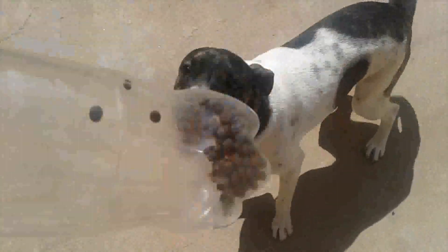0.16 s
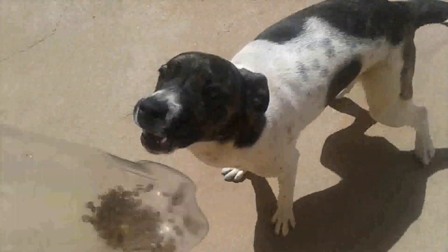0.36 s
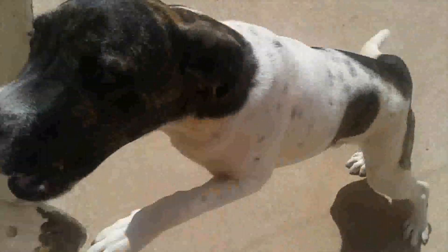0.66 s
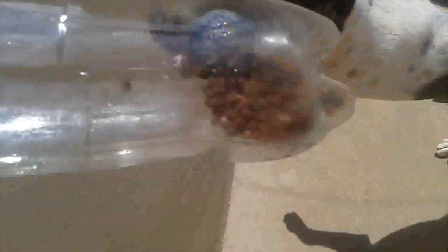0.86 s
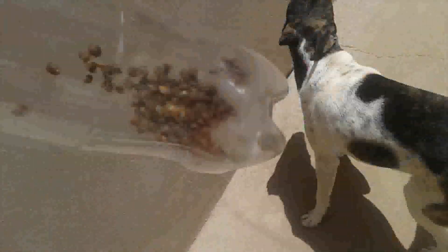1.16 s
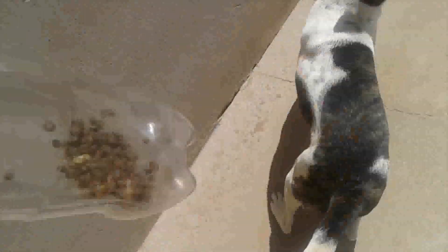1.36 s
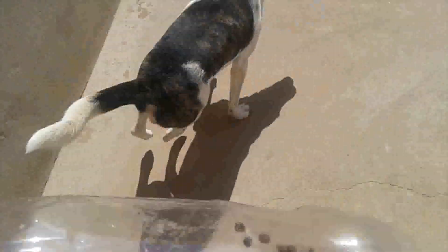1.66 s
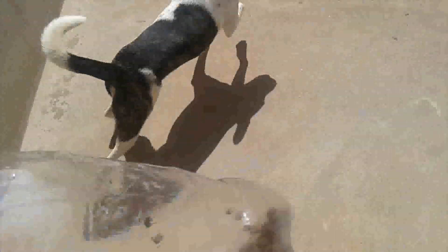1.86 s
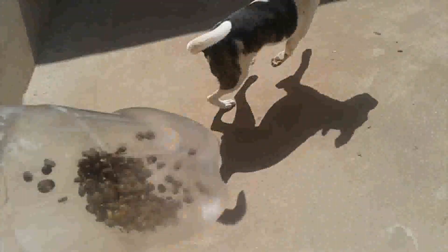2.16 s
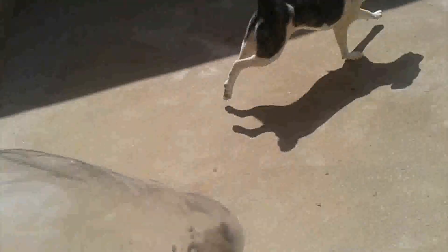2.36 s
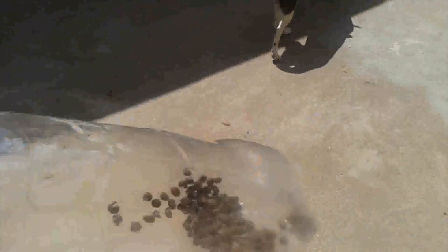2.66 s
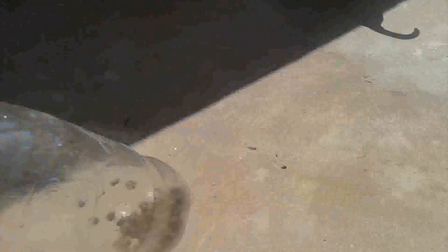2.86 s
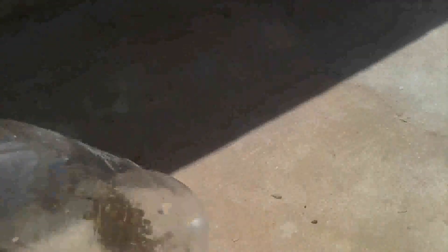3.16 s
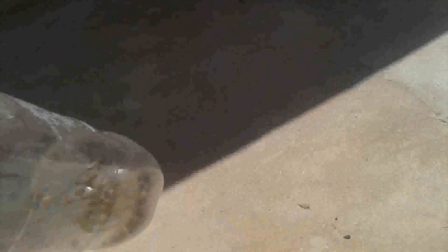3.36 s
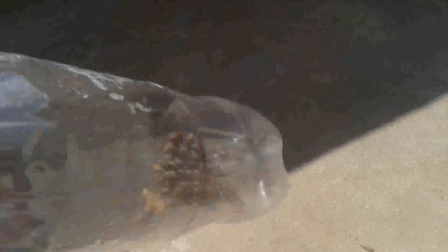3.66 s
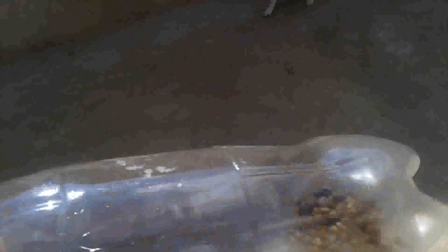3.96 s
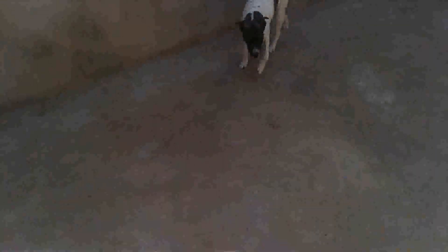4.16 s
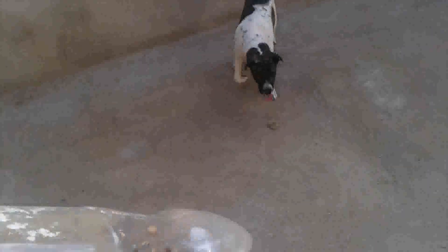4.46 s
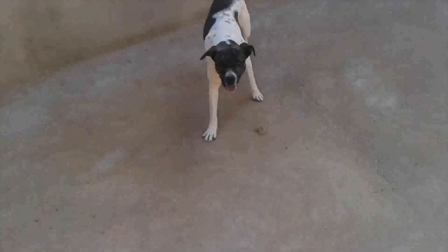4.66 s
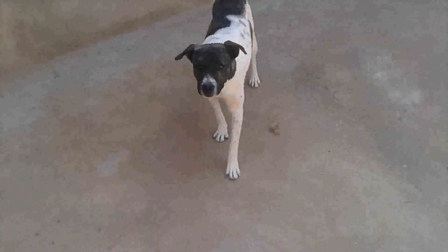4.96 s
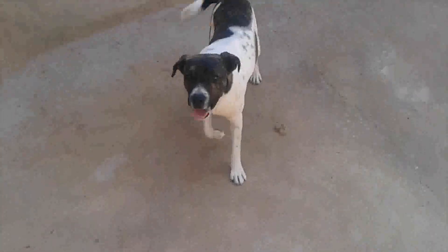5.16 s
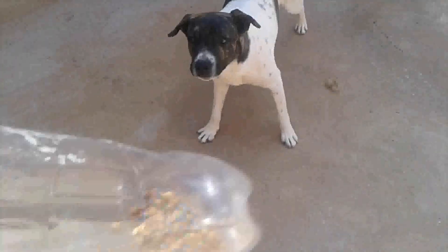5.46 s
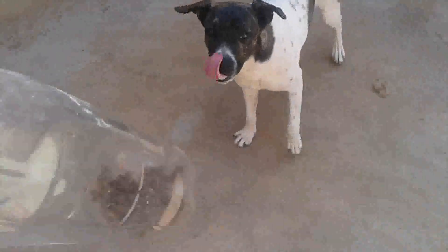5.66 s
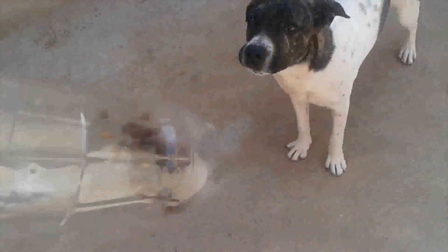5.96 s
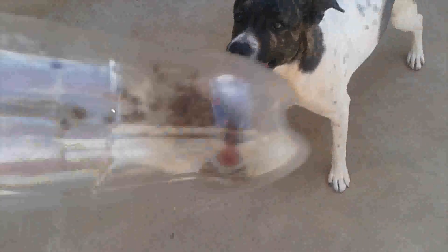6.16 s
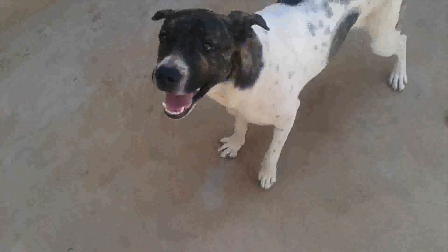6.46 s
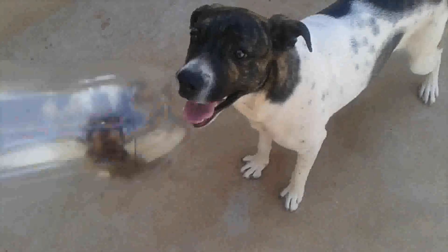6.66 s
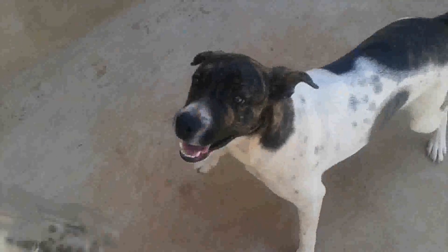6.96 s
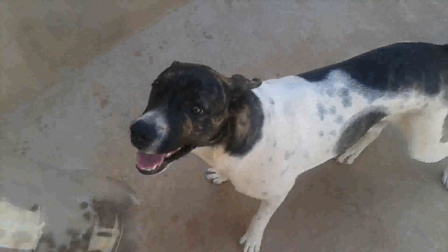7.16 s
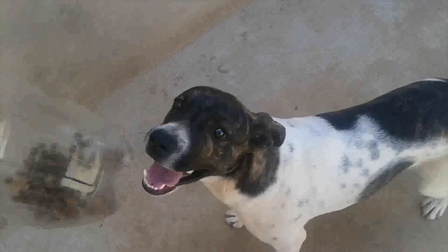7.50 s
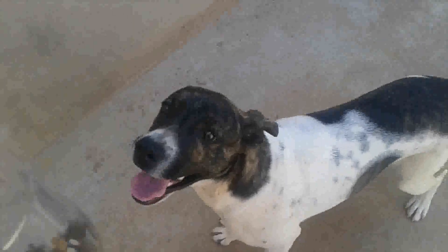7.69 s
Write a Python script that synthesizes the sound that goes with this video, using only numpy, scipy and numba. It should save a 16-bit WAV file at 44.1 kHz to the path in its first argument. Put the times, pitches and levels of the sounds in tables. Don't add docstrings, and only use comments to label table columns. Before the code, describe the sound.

From the very start, dry kibble is shaken quickly to and fro in a large, thin-walled plastic bottle about an arm's length from a phone in a concrete yard. About every 0.15 seconds the heap slams into the plastic as a dense, crunchy burst of tiny impacts, often led by one or two sharp ticks, while loose pellets rattle between strokes. Force and colour vary: duller around 1.2 seconds, fuller and more hollow from 2 to 5.8, softer around 4.2, then strong hits near 4.9 and 6.0. At about 6.5 two hard knocks end the run; stragglers settle into faint ticks and near quiet until 6.8. Vigorous shaking then resumes, loudest around 7.0 to 7.3, continuing to the end at about 8 seconds. A short diffuse echo, faint wavering low hum and distant outdoor wash remain behind.

```python
import sys
import numpy as np
from scipy import signal
from scipy.fft import rfft, irfft
from scipy.io import wavfile
from scipy.ndimage import uniform_filter1d
from numba import njit

SR = 44100
rng = np.random.default_rng(int(sys.argv[2]) if len(sys.argv) > 2 else 0)


def inscribe(sig):
    pcm = np.round(np.clip(np.atleast_2d(sig).T, -1, 1) * 32767)
    wavfile.write(sys.argv[1], SR, pcm.astype(np.int16))


def level_to_linear(level):
    exponent = np.asarray(level, float) / 20
    return 10 ** exponent


N = 345303

# start_s [s], peak_db [dB], ring_hz [Hz]
LEADERS = [(0.0235, -15, 4930), (0.2279, 0, 1910), (3.6973, 0, 2620), (.631, -8, 1640), (.9818, 1, 2640),
           (1.0013, -10, 2430), (1.1003, -3, 2000), (1.1264, 2, 1630), (1.3975, 3, 3320), (1.4127, 5, 2160),
           (1.5402, 3.5, 2440), (1.8, -6, 3250), (1.922, 0, 1120), (2.2016, 4.5, 3730), (2.336, 8.5, 4830),
           (4.586, -1, 1910), (2.703, 5, 2160), (2.8489, 0, 1950), (3.0792, 2, 3190), (3.5915, 1.5, 1970),
           (4.2773, -4, 3400), (4.397, -6, 1790), (4.8399, 1.5, 3400), (5.115, 3.5, 3960),
           (5.8413, 6.5, 3800), (6.191, 4.5, 2180), (6.2998, -1, 3300), (6.8663, 2, 2980), (7.247, 6, 1810),
           (7.535, 2.5, 2440)]
# start_s [s], peak_db [dB], ring_hz [Hz]
STRAY_PELLETS = [
    (6.471, 4, 1500),
    (6.4809, 3.5, 1500),
    (6.525, -10, 1880),
    (6.604, -16, 1620),
    (6.647, -15, 1540),
    (6.7714, -33, 1110),
    (6.826, -19, 3000),
]


def set_level(x, db):
    return x * level_to_linear(db) / np.sqrt(np.mean(x ** 2))


def on_log_axis(table, hz):
    points = np.array(table)
    return np.interp(np.log(hz), np.log(points[:, 0]), points[:, 1])


def walk(rate):
    hold = int(SR / rate)
    steps = np.repeat(rng.standard_normal(N // hold + 1), hold)
    return 1.3 * uniform_filter1d(uniform_filter1d(steps, hold), hold)[:N]


def kibble():
    # start_s [s], level_db [dB], build_up_ms [ms], die_away_ms [ms]
    forth = [(.032, -14, 20.5, 15), (.233, -15.5, 16.4, 29), (.526, -12, 15, 44), (0.727, -13.5, 38, 36),
             (1.015, -10.5, 29, 12), (1.318, -9.5, 38, 19), (1.554, -13.5, 24, 43), (1.822, -13, 28.5, 30),
             (2.103, -13.5, 14, 28), (2.34, -13.5, 18, 27), (2.608, -16, 55, 23), (2.878, -14.5, 36, 20),
             (3.097, -12.5, 22, 49), (3.355, -12, 28, 29), (3.605, -10, 20, 24.3), (3.851, -14.5, 25, 48),
             (4.145, -21, 27, 20), (4.418, -16.5, 32, 22), (4.627, -10.5, 13, 14.4),
             (4.867, -8.5, 10, 13.4), (5.118, -12, 13.4, 31), (5.389, -14.5, 31, 18),
             (5.624, -12, 25.5, 13), (5.852, -14.5, 36, 18), (6.076, -12, 14, 31), (6.32, -12.5, 22.6, 36),
             (6.888, -11.5, 23, 12), (7.176, -11, 49, 16.5), (7.432, -12.5, 14.3, 13),
             (7.746, -16.5, 41, 15)]
    # start_s [s], level_db [dB], build_up_ms [ms], die_away_ms [ms]
    back = [(.132, -13.5, 18.5, 13), (.409, -19, 33, 32), (0.633, -10, 10.4, 30), (.863, -14.5, 13.4, 30),
            (1.156, -10, 46, 32.5), (1.411, -9, 16, 25), (1.684, -11, 23, 31.4), (1.962, -12.5, 12, 31),
            (2.206, -15.5, 22, 31), (2.455, -12.5, 16, 31), (2.713, -13, 22, 32), (2.986, -10, 16.7, 29),
            (3.227, -12.5, 34, 36), (3.473, -13, 23, 35), (3.729, -10, 31.4, 23.5),
            (3.966, -13, 21.5, 29.6), (4.281, -15.5, 14, 24), (4.512, -15, 28, 21),
            (4.744, -13.5, 20.4, 31), (4.987, -12.5, 25, 25), (5.253, -9.5, 16.6, 6.9),
            (5.493, -12, 22, 17.6), (5.748, -13, 37, 14.6), (5.968, -15, 15, 47), (6.199, -11, 19, 18),
            (6.513, -22, 41, 64), (7.039, -8.5, 24, 14), (7.279, -9.5, 38, 19), (7.567, -13, 14, 15),
            (7.85, -14.5, 31, 20)]
    # start_s [s], level_db [dB], build_up_ms [ms], die_away_ms [ms]
    slips = [(.444, -18.5, 45, 10.4), (.606, -18, 4.5, 10), (0.691, -11, 2.4, 3.2), (7.411, -16, 10, 8),
             (.835, -16.5, 20, 24), (1.056, -16, 14, 18), (1.103, -19, 4, 14), (1.223, -17.5, 65, 3.4),
             (1.352, -19.5, 4, 23), (1.931, -15.5, 12, 23), (2.433, -17.5, 30, 13), (2.956, -15.5, 20, 4.4),
             (3.566, -22, 7.2, 15), (4.263, -17, 21, 5), (4.604, -18, 20, 4), (4.847, -15.5, 9, 7.2),
             (5.083, -19.5, 4, 13), (5.206, -21.5, 9, 60), (5.269, -19, 3.6, 20), (5.961, -7, 15, 2.9),
             (6.241, -17, 79, 9.9), (6.407, -22.5, 10, 33), (6.476, -16.5, 26, 9.4), (6.938, -17.5, 3, 8.8),
             (7.002, -8, 3, 16), (7.053, -11, 10, 27), (7.32, -17, 7.3, 11), (7.393, -13.5, 4.7, 6.3),
             (7.543, -14.5, 21, 6.1), (7.655, -21, 3.1, 11)]
    # start_s [s], stragglers_db [dB], barrel_db (barrel facing the listener) [dB],
    # ring_hz (struck wall) [Hz], brightness_db [dB]
    hold = [(0, -30.5, -10, 1900, -0.5), (.45, -29, -7.5, 1710, -4), (.84, -26, -11, 1810, -5),
            (1.01, -26, -10.5, 2300, 2), (1.2, -26, -23, 1745, -7), (1.5, -26, -11.5, 2110, -2.5),
            (2.0, -30, -1, 2130, 0), (3.05, -23.5, -0.5, 2020, 1.5), (3.55, -30, -1, 2160, -1),
            (4.2, -29, 0, 1895, 1), (5.15, -24, -1, 1980, 1), (5.85, -28, -3.5, 2280, -3.5),
            (5.97, -20, -10, 1540, -5.5), (6.15, -26, -4.5, 2340, -1), (6.5, -32.5, -10.5, 1614, -7.5),
            (7.25, -24, -12, 1750, -1.5), (7.56, -29.5, -3.5, 2430, -4.5), (7.75, -28, -6.5, 1450, -4.5)]

    pellets_per_s = 3000
    s = np.sort(rng.random(int(pellets_per_s * N / SR))) * N / SR
    turn, weight = rng.random(len(s)), rng.exponential(size=len(s))

    at, slam_db, up_ms, down_ms = np.transpose(forth + back + slips)
    late_ms = 1000 * (s[:, None] - at)
    rise = (np.abs(late_ms) / (0.84 * up_ms)) ** 1.75
    fall = (np.abs(late_ms) / down_ms) ** 1.77
    slams = level_to_linear(slam_db - 6.53 * np.where(late_ms < 0, rise, fall)) ** 2

    knots, tumble_db, barrel_db, ring_hz, bright_db = np.transpose(hold)
    rest_from_s, rest_until_s, settle_db_per_s, restart_s = 6.55, 6.81, -150, 0.021
    resting = np.clip(1 - (s - rest_until_s) / restart_s, 0, 1)
    rest_db = settle_db_per_s * np.maximum(s - rest_from_s, 0) * resting
    tumble = level_to_linear(np.interp(s, knots, tumble_db) + rest_db) ** 2
    power = slams.sum(axis=1) + tumble

    is_slip = np.arange(len(at)) >= len(forth + back)
    colour_db = np.interp(at, knots, bright_db) - 4 * is_slip
    tumble_colour_db = 0.4 * np.interp(s, knots, bright_db) - 4
    bright = (slams @ colour_db + tumble * tumble_colour_db) / power
    barrel = np.interp(s, knots, barrel_db)

    lull_db, lull_ms, volley_db, volley_ms = -4, 10, -15.5, 5.2
    strike_s, strike_db, _ = np.transpose(LEADERS + STRAY_PELLETS)
    after_ms = 1000 * (s[:, None] - strike_s)
    approach = np.where(after_ms < 0, np.exp(-np.abs(after_ms) / lull_ms), 0)
    lull = level_to_linear(lull_db * approach.sum(axis=1))
    decay = np.where(after_ms < 0, 0, np.exp(-np.abs(after_ms) / volley_ms))
    volley = level_to_linear(strike_db + volley_db) * decay
    power = power * lull ** 2 + (volley ** 2).sum(axis=1)

    share = np.clip((power / level_to_linear(-15) ** 2) ** 0.295, .05, 1)
    flying = np.clip((share - turn) / 0.045 + .5, 0, 1)
    mid = power / (2.4 + level_to_linear(barrel) ** 2 + level_to_linear(bright) ** 2)
    size = flying * np.sqrt(mid / share) * level_to_linear(3.4 * np.minimum(weight, 4.5))
    spot_hz = np.interp(at, knots, ring_hz)[np.argmax(slams, axis=1)]
    chance = draws(count=len(s), order=8)
    stream = wall_modes(s, chance, spot_hz, barrel + 6, bright + 2.79, size, ring_share=.4, t60=.018)
    return set_level(stream, -0.35) * np.sqrt(np.mean(power))


def strikes():
    s, peak_db, hz = np.transpose(LEADERS + STRAY_PELLETS)
    flat = np.zeros(len(s))
    pick, place, scatter = draws(count=len(s), order=24)
    in_step = (pick, place, np.abs(scatter))
    ticks = wall_modes(s, in_step, hz, flat - 3.5, flat - 1.5, level_to_linear(peak_db), ring_share=.45, t60=.013)
    return ticks * level_to_linear(-77)


def wall_modes(s, chance, ring_hz, barrel_db, bright_db, size, ring_share, t60):
    # mode_hz [Hz], density_db [dB per Hz]
    plastic = [(120, -50), (200, -71), (422, -24.5), (585, -18), (1030, 0), (1300, -6), (1510, 1),
               (1950, 0), (2700, -1), (3300, -1), (5910, -5.5), (8660, -18), (14400, -22.5), (15500, -59)]
    # start_s [s], level_db [dB]
    deep_body = [(0, 5), (1, 21), (2, 7.5), (3, 6.5), (4, -1), (5, 0), (6, -13), (7, 10), (7.8, -12)]

    pick, place, scatter = chance
    hz = 200 * 75 ** place
    mid_share = ring_share * (np.abs(np.log(hz / 1900)) < .4)
    at_spot = pick < mid_share
    detune = .11 * (pick / np.maximum(mid_share, .01) * 2 - 1)
    hz = np.where(at_spot, ring_hz[:, None] * np.exp(detune), hz)
    t60s = t60 * (2000 / hz) ** .5 * np.exp(0.16 * scatter)

    boom = 1 / (1 + (hz / 600) ** 8)
    barrel = 1 / (1 + (hz / 1300) ** 8) - boom
    edge = 1 / (1 + (2900 / hz) ** 5)
    db = on_log_axis(plastic, hz) + barrel * barrel_db[:, None] + edge * bright_db[:, None]
    db = db + boom * np.interp(s, *np.transpose(deep_body))[:, None]
    db = db - .4 * at_spot * bright_db[:, None]
    gain = size[:, None] * level_to_linear(db) * np.sqrt(hz / t60s) * np.sign(scatter)
    return ring(np.repeat(s, hz.shape[1]), hz.ravel(), t60s.ravel(), gain.ravel())


def draws(count, order):
    place = (np.arange(order) + rng.random((count, order))) / order
    return rng.random((count, order)), place, rng.standard_normal((count, order))


@njit
def ring(start, hz, t60, size):
    out = np.zeros(N)
    for k in range(len(start)):
        turn = np.exp(2j * np.pi * hz[k] / SR - np.log(1000) / (t60[k] * SR))
        z = size[k] + 0j
        first = int(start[k] * SR)
        for j in range(max(first, 0), min(N, first + int(.8 * t60[k] * SR))):
            out[j] += z.imag
            z *= turn
    return out


def bottle_colour(x):
    x = signal.sosfilt(signal.butter(2, 260, "high", fs=SR, output="sos"), x)
    return signal.sosfilt(signal.butter(2, 8000, fs=SR, output="sos"), x)


def echoes(x):
    yard_t60_s, swing_hz = 0.27, 1.3
    t, out = np.arange(SR // 4) / SR, 0
    swing = 2 * np.pi * swing_hz * np.arange(N) / SR
    for k in range(4):
        tail = rng.standard_normal(len(t)) * level_to_linear(-60 * t / yard_t60_s) * (t > .003)
        facing = np.clip(np.cos(swing - k * np.pi / 2), 0, 1)
        out = out + signal.fftconvolve(x * facing, tail / np.sqrt(np.sum(tail ** 2)))[:N]
    return out


def hum():
    # start_s [s], level_db [dB]
    loudness = [(0, -60), (.3, -43.5), (1.2, -45.5), (1.65, -53), (2.2, -45.5), (3.0, -39.5), (3.3, -44),
                (3.9, -44.5), (4.2, -47.5), (5.1, -46), (5.45, -53), (5.7, -85), (6.0, -51.5), (6.6, -49.5),
                (6.9, -42.5), (7.5, -42.5), (7.8, -45)]
    t = np.arange(N) / SR
    gain = np.sqrt(2) * level_to_linear(np.interp(t, *np.transpose(loudness)))
    mains = level_to_linear(2.6 * walk(20)) * np.sin(2 * np.pi * 120.4 * t + .5 * walk(8))
    fan = level_to_linear(-12 + 2.5 * walk(2)) * np.sin(2 * np.pi * 146.5 * t + walk(9))
    return gain * (mains + fan)


def yard():
    # band_hz [Hz], density_db [dB per Hz]
    spectrum = [(40, 10), (95, 21), (200, 4.5), (500, 11), (2100, 11.5), (5500, 5), (9800, -15),
                (15000, -11)]
    hz = np.maximum(np.arange(N // 2 + 1) * SR / N, 1)
    wash = irfft(rfft(rng.standard_normal(N)) * level_to_linear(on_log_axis(spectrum, hz)), N)
    return set_level(wash * level_to_linear(2.0 * walk(2.91)), -42.5)


def scene():
    bottle = bottle_colour(kibble() + strikes())
    return (bottle + level_to_linear(-9.5) * echoes(bottle) + hum() + yard())[None]


def roll_off(x):
    return signal.sosfilt(signal.butter(12, 15870, fs=SR, output="sos"), x)


def record(dry):
    x = np.tanh(1.2 * dry) / 1.2
    x = signal.sosfilt(signal.butter(2, 90, "high", fs=SR, output="sos"), x)
    x = signal.sosfilt(signal.ellip(8, .2, 70, 15000, fs=SR, output="sos"), x)
    return roll_off(x)


dry = scene()
out = record(dry)
inscribe(out)
```